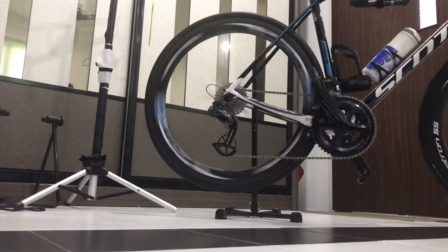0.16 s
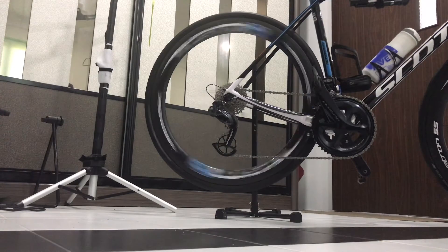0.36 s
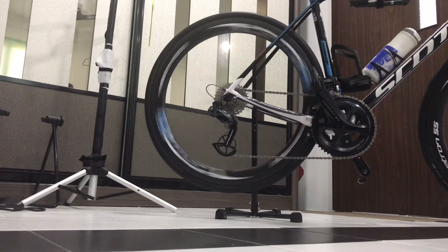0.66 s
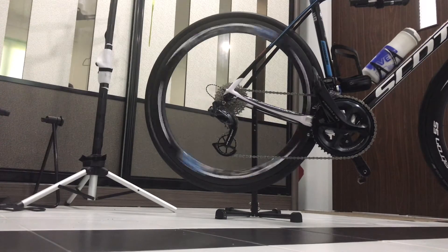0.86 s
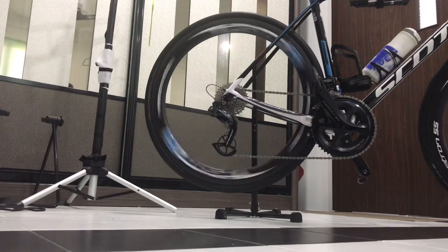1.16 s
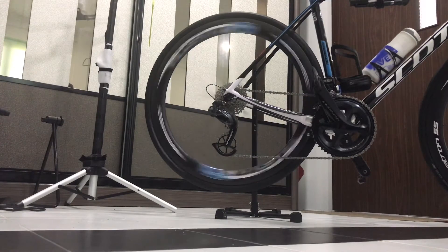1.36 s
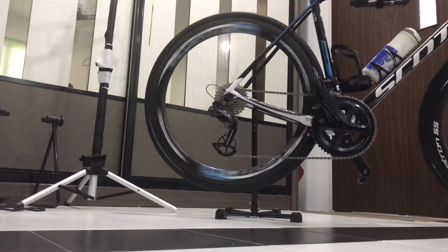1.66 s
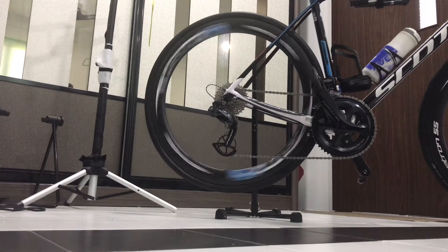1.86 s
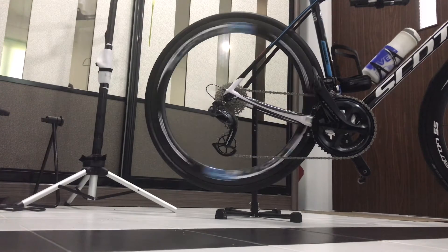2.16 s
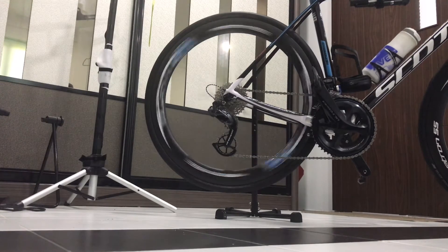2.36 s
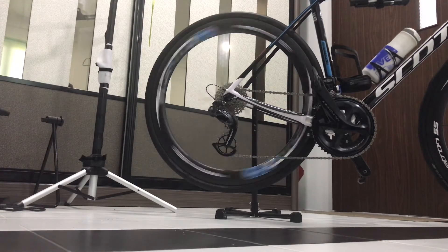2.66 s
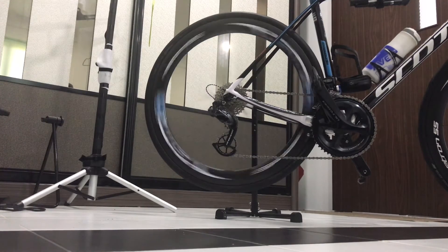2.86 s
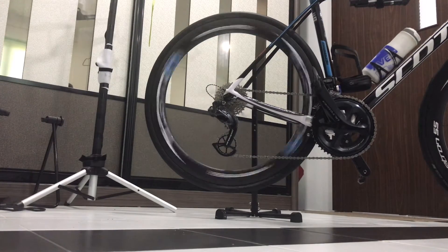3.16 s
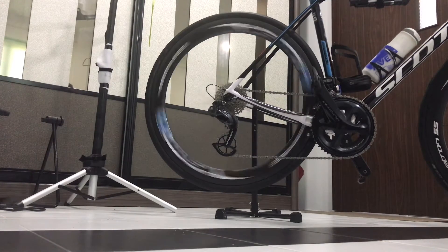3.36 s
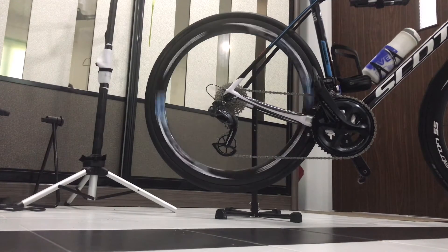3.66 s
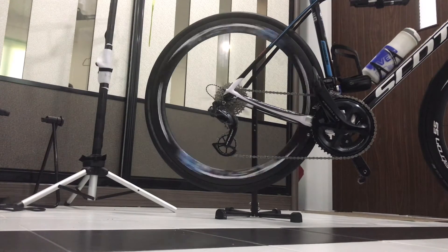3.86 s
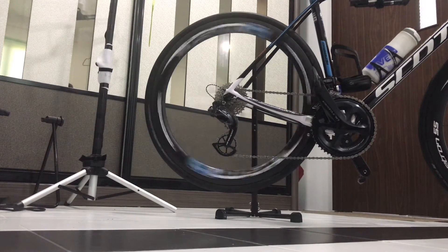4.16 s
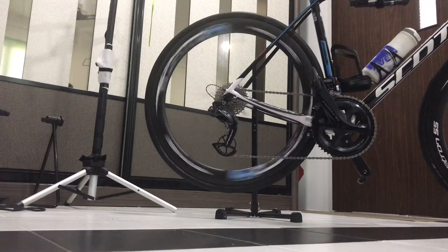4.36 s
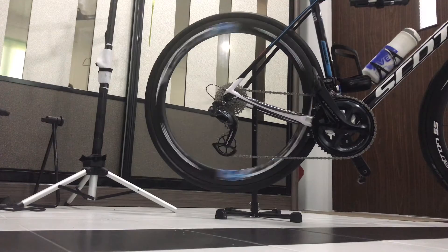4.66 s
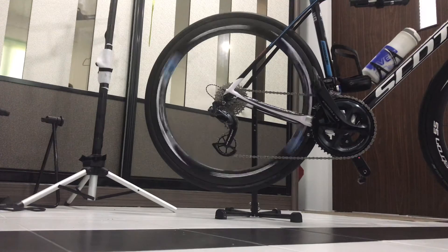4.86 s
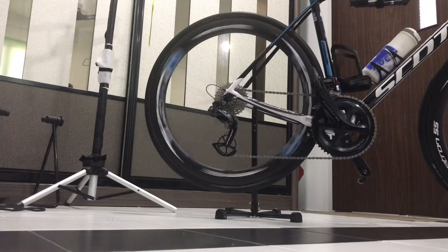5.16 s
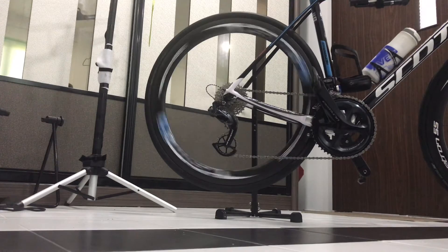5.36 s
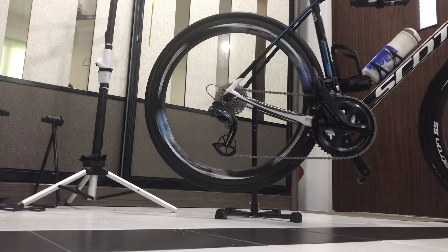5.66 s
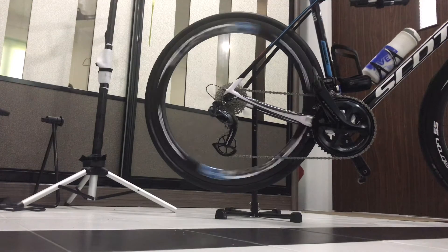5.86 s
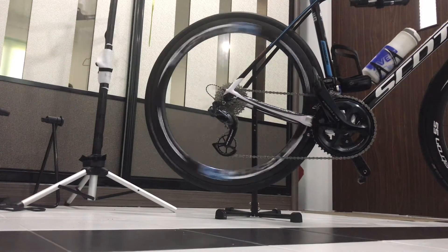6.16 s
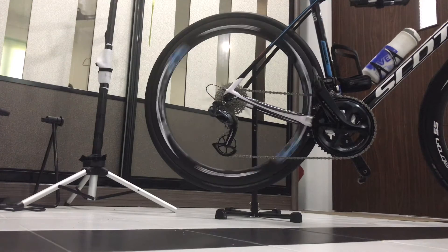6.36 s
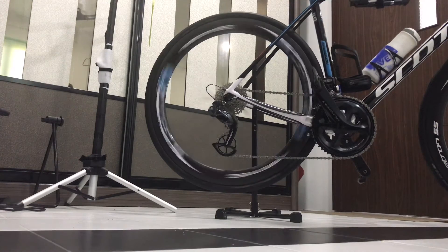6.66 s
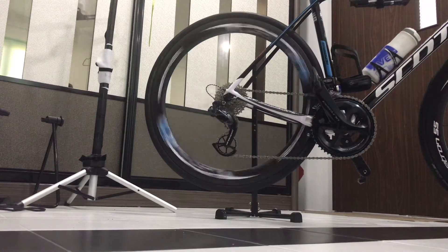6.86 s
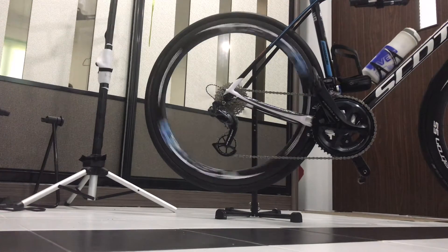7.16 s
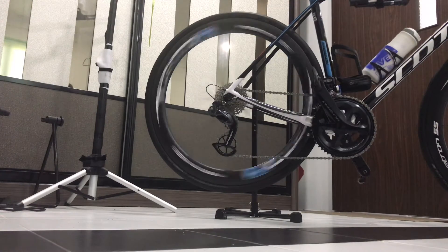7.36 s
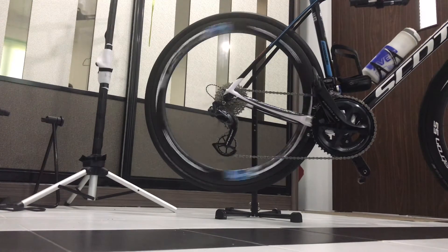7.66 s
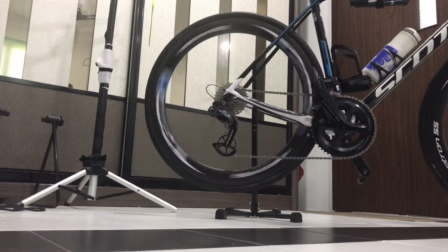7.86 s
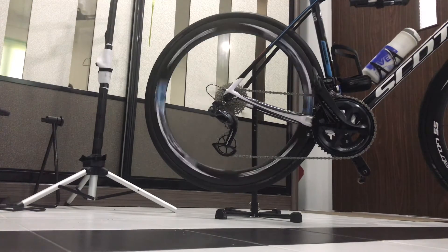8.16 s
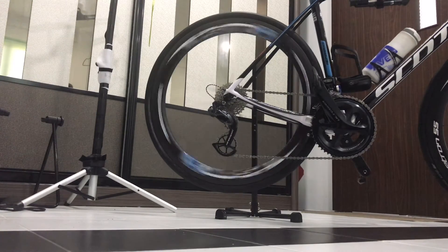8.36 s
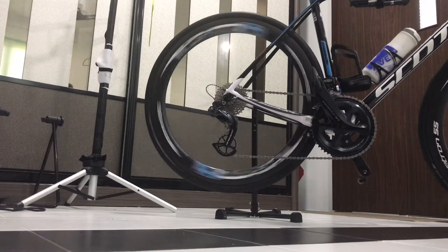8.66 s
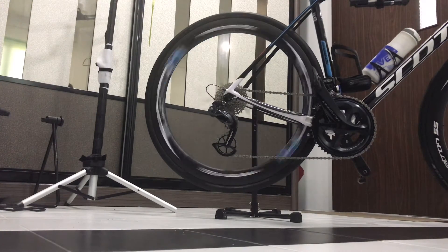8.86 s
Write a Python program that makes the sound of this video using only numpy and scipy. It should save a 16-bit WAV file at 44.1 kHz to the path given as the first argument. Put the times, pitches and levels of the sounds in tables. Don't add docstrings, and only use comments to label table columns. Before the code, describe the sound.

A bicycle's rear wheel coasts on a stand indoors. Its hub ratchet makes sharp steel clicks, nearly fifty a second at first, merging into a bright rattling buzz that slows steadily to somewhat under forty. The clicks vary slightly in tone and timing, repeating with each wheel turn. Close hard surfaces add brief echoes. Ventilation rumble and distant machine hum lie faintly underneath. Single-channel pickup, fairly near.

```python
import sys
import numpy as np
from scipy import signal
from scipy.fft import rfft, irfft, next_fast_len
from scipy.io import wavfile
from scipy.ndimage import uniform_filter1d, map_coordinates

SR = 44100
rng = np.random.default_rng(int(sys.argv[2]) if len(sys.argv) > 2 else 0)


def file_out(sig):
    cols = np.atleast_2d(sig).T
    lim = np.clip(cols, -1, 1)
    pcm = np.round(lim * 32767).astype(np.int16)
    wavfile.write(sys.argv[1], SR, pcm)


def boost_factor(decibels):
    exponent = np.asarray(decibels, float) / 20
    return 10 ** exponent


N = 397782
TEETH_COUNT = 24


def ratchet():
    # f/Hz, level/dB
    facing_tone = [(1900, -4), (3200, -2.5), (9000, -.5)]
    level_db, scatter_db = -31, 0.55
    moment, tooth = drops()
    t = np.arange(3072) / SR
    blow = crack(tooth, t) + boost_factor(-6) * ringing(tooth, t)

    def radiated(hz):
        return boost_factor(along(facing_tone, hz)) * shaded(tooth, hz) * coloured(tooth, hz)

    blow = filtered(blow, radiated)
    blow = blow * boost_factor(level_db + scatter_db * rng.standard_normal(len(moment)))[:, None]
    heard = signal.fftconvolve(blow, room(wet_db=-2.5)[tooth], axes=1)
    start = np.round((moment + .5 - .0004) * SR).astype(int)
    at = start[:, None] + np.arange(heard.shape[1])
    return np.bincount(at.ravel().clip(0), heard.ravel())[SR // 2:N + SR // 2]


def drops():
    # start/teeth, rate/(teeth/s), drag/(teeth/s^2), easing/(teeth/s^3)
    coast = (0.11899, 46.85736, 0.582202, 0.00252791)
    # waves per turn, late/ms, angle/turns
    runout = [
        (1, .3, .39),
        (3, .11, .4),
        (5, .08, .4),
    ]
    t = np.arange(-SR // 2, N) / SR
    start, rate, drag, easing = coast
    passed = start + rate * t - drag * t ** 2 + easing * t ** 3
    count = np.arange(np.ceil(passed[0]), passed[-1]).astype(int)
    late_ms = sum(ms * np.cos(2 * np.pi * waves * (count / TEETH_COUNT - at)) for waves, ms, at in runout)
    return np.interp(count, passed, t) + late_ms / 1000, count % TEETH_COUNT


def crack(tooth, t):
    # f/Hz, level/dB per Hz
    steel = [(350, -21.5), (750, -27.5), (1310, -13.5), (1800, -6.5), (2800, -3), (4020, -10.5),
             (4940, -18.5), (5700, -16), (6950, -11), (8400, -10.5), (8800, -6), (10500, -6), (13500, 0.5),
             (15800, -4.5)]
    # f/Hz, level/dB over the crack
    contact = [(500, 13), (1100, 25.5), (1600, 9), (3000, 8), (4200, 17.5), (7000, 7.5), (12000, 5)]
    # f/Hz, width/Hz, level/dB over the crack
    hub_modes = [(6250, 144, 8), (8770, 210, -7.5), (9770, 223, 3.5), (11060, 250, 2), (12200, 200, -9),
                 (14700, 280, -7), (15670, 194, 5)]
    gap_ms, gap_spread, second_level_db, second_spread_db = 1.1, .3, -9, 4
    low_rise_s, high_rise_s = .0012, 0.00061
    top_scatter_db, lobe_gain = 1.1, .65

    gap, size = worn(tooth, 2, fresh=0.081).T
    second_db = second_level_db + second_spread_db * size[:, None]
    later = np.clip(t - gap_ms * np.exp(gap_spread * gap[:, None]) / 1000, 0, None)

    def strike(since, t60, rise):
        return boost_factor(-60 * since / t60) * (1 - np.exp(-since / rise))

    def pawls(t60, rise=high_rise_s):
        return strike(t, t60, rise) + boost_factor(second_db) * strike(later, t60, rise / 4)

    burst = worn(tooth, len(t), fresh=0.35)
    low = evened(burst * pawls(0.049, low_rise_s), size=40, share=0.44)
    high = evened(burst * (pawls(0.019) + boost_factor(-9.0) * pawls(0.029)), size=40, share=0.49)
    top = evened(burst * (pawls(0.0099) + boost_factor(-10.5) * pawls(0.044)), size=40, share=0.64)

    def treble(hz):
        return 1 / (1 + (5200 / (hz + 1)) ** 6)

    def sharp(hz):
        return 1 / (1 + (11800 / (hz + 1)) ** 12)

    def hub(hz):
        return 1 + sum(boost_factor(db) / (1 + ((hz - centre) / width) ** 2) for centre, width, db in hub_modes)

    mode_hz, _, facing = beamed(tooth)

    def lobed(hz):
        return boost_factor(lobe_gain * np.array([np.interp(hz, mode_hz, row) for row in facing]))

    low = filtered(low, lambda hz: boost_factor(along(steel, hz) + 1.5) * (1 - treble(hz)) * lobed(hz))
    high = filtered(high, lambda hz: boost_factor(along(steel, hz)) * treble(hz) * hub(hz) * (1 - sharp(hz)))
    top = filtered(top, lambda hz: boost_factor(along(steel, hz) + 0.5) * hub(hz) * sharp(hz))
    top = top * boost_factor(top_scatter_db * worn(tooth, 1, fresh=0.3))
    click = 1. * (t == t[32])
    tick = filtered(click, lambda hz: boost_factor(along(steel, hz) + along(contact, hz)))
    return unit(tick + low + high + top)


def ringing(tooth, t):
    # f/Hz, t60/s, level/dB
    ring = [(1460, 0.023, 2), (1860, 0.024, -1), (2220, 0.04, 0.5), (2400, 0.018, -2), (2890, 0.036, -1),
            (3130, 0.037, -2.5), (3240, 0.043, -3.5), (4030, 0.018, 0.5), (5730, 0.017, 2.5),
            (6440, 0.047, 0), (8150, 0.031, 2)]
    lobe_gain, rise_s = 1.05, 0.0018
    hz, db, facing = beamed(tooth)
    t60 = along(np.array(ring)[:, :2], hz)
    trim_db = along(np.array(ring)[:, ::2], hz)
    lobes_db = lobe_gain * facing + .6 * worn(tooth, len(hz), fresh=.25)
    gain = boost_factor(db + trim_db + lobes_db) / np.sqrt(t60)
    phase = 2 * np.pi * rng.random(len(hz)) + hz / 2500 * worn(tooth, len(hz), fresh=0.11)
    fade = boost_factor(-60 * t / t60[:, None]) * (1 - np.exp(-t / rise_s))
    swing = 2 * np.pi * hz[:, None] * t
    sines = (gain * np.cos(phase)) @ (fade * np.sin(swing))
    cosines = (gain * np.sin(phase)) @ (fade * np.cos(swing))
    return unit(sines + cosines)


def beamed(tooth):
    # f/Hz, level/dB, lobe/dB, first angle/turns,
    # second angle/turns
    wheel_modes = [(1545, -3.5, 6.5, .35, .03), (1630, -5.3, 6, .29, .96), (1725, -.3, 4, .23, .54),
                   (1840, -1, 8, .73, .17), (1915, .3, 9, .73, .125), (1990, -.5, 6.5, .7, .135),
                   (2080, -1.7, 6.5, .52, .82),
                   (2240, -3.9, 4.5, .73, 0), (2350, -3, 3.5, .98, .5), (2470, -2, 4.5, .98, .42),
              (2600, -4.4, 5.5, .96, .43), (2700, -1.5, 6, .99, .81), (2785, -2, 4, .96, .36),
              (2900, -.5, 2, .58, .28), (3100, -7, 4, .8, .49), (3450, -5.9, 5, .62, .21),
                   (4050, -8.8, 3, .63, .03), (5700, -11.7, 4, .94, .63), (6330, -4.5, 3, .92, .6),
             (7960, -9, 3, .68, .09)]
    focus = 4
    hz, db, lobe_db, *beams = np.transpose(wheel_modes)
    angle = tooth[:, None] / TEETH_COUNT
    beam = sum(np.exp(focus * (np.cos(2 * np.pi * (angle - at)) - 1)) for at in beams)
    return hz, db, lobe_db * (beam - beam.mean(axis=0))


def shaded(tooth, hz):
    # f/Hz, width/Hz, depth/dB, angle/turns
    shade = (5940, 300, 1.1, 0.087)
    centre, width, depth_db, at = shade
    away = np.cos(2 * np.pi * (tooth[:, None] / TEETH_COUNT - at))
    return boost_factor(-depth_db * away * np.exp(-((hz - centre) / width) ** 2))


def coloured(tooth, hz):
    # f/Hz, spread/dB
    tooth_colour = [(2500, 0.5), (3500, 2.5), (8000, 1.5), (10000, 2.4), (13000, 0.8)]
    own = uniform_filter1d(rng.standard_normal((TEETH_COUNT, len(hz))), size=50, axis=1)
    return boost_factor(along(tooth_colour, hz) * unit(own))[tooth]


def worn(tooth, size, fresh):
    fresh = np.clip(fresh, 0, 1)
    own = rng.standard_normal((TEETH_COUNT, size))[tooth]
    return np.sqrt(1 - fresh) * own + np.sqrt(fresh) * rng.standard_normal((len(tooth), size))


def room(wet_db):
    # f/Hz, t60/s
    room_fade = [(500, 0.43), (2000, 0.33), (3500, 0.45), (6000, 0.54), (15000, 0.11)]
    # t/s, level/dB
    walls = [
        (.0035, -18),
        (.0065, -26),
        (.0095, -35),
        (0.0138, -13.5),
    ]
    shared_below_hz = 3500
    hz, t, z = signal.stft(rng.standard_normal((TEETH_COUNT, SR // 4)), SR, nperseg=256)
    shared = (z + np.roll(z, 1, axis=0) + np.roll(z, -1, axis=0)) / np.sqrt(3)
    z = np.where(hz[:, None] < shared_below_hz, shared, z)
    tail = signal.istft(z * boost_factor(-60 * t / along(room_fade, hz)[:, None]), SR, nperseg=256)[1]
    tail = boost_factor(wet_db) * tail / np.linalg.norm(tail, axis=1, keepdims=True)
    answer = np.pad(tail, ((0, 0), (round(.004 * SR), 0)))
    answer[:, 0] = 1
    for s, db in walls:
        shifted = np.round((s + .0001 * rng.standard_normal(TEETH_COUNT)) * SR).astype(int)
        answer[np.arange(TEETH_COUNT), shifted] += boost_factor(db)
    return answer


def air():
    # f/Hz, level/dB per Hz
    air_tone = [(28, -44), (40, -5), (70, -6.5), (110, -4.5), (190, -4.5), (300, -6.5), (455, -10),
                (741, -12.5), (1300, -14), (1700, -49), (2900, -120)]
    level_db, patch_db = -55.5, 1.5
    z = signal.stft(rng.standard_normal(N), nperseg=2048)[2]
    patches = uniform_filter1d(rng.standard_normal(z.shape), size=8, axis=0)
    patches = unit(uniform_filter1d(patches, size=10, axis=1))
    noise = signal.istft(z * boost_factor(patch_db * patches), nperseg=2048)[1][:N]
    return boost_factor(level_db) * unit(filtered(noise, lambda hz: boost_factor(along(air_tone, hz))))


def machines():
    # f/Hz, level/dB, unsteadiness/rad
    hum_lines = [(48, -68, 1.8), (98, -63.5, 2.5), (122, -69, 2.2), (143, -67, 1.5), (161.5, -64.5, 1.5),
                 (200, -71, 1.8), (290, -74, 2.2), (607, -76, 3), (900, -78, 4), (1030, -77, 4)]
    swell_db = 2
    t = np.arange(N) / SR
    hum = np.zeros(N)
    for hz, db, unsteady in hum_lines:
        drift = np.cumsum(rng.standard_normal(N)) * unsteady / 160
        hum += boost_factor(db + 3.5 + swell_db * wobble(4)) * np.sin(2 * np.pi * hz * t + drift)
    return hum


def wobble(rate):
    return map_coordinates(rng.standard_normal(int(N * rate / SR) + 4), [np.arange(N) * rate / SR])


def evened(bursts, size, share):
    z = rfft(bursts)
    broad = uniform_filter1d(abs(z) ** 2, size=size, axis=1)
    return irfft(z * (broad / broad.mean()) ** (-np.clip(share, 0, 1) / 2), bursts.shape[1])


def unit(x):
    return x / np.sqrt(np.mean(x ** 2) + 1e-20)


def along(points, hz):
    f, v = np.transpose(points)
    return np.interp(np.log(hz + 1), np.log(f + 1), v)


def filtered(x, response):
    n = x.shape[-1]
    m = next_fast_len(n + 1024)
    return irfft(rfft(x, m) * response(np.fft.rfftfreq(m, 1 / SR)), m)[..., :n]


def scene():
    return (boost_factor(-6) * ratchet() + air() + machines())[None]


def low_pass(x):
    return signal.sosfilt(signal.butter(12, 16850, fs=SR, output="sos"), x)


def record(dry):
    top_hz = 15780

    def band(hz):
        skirt = boost_factor(-45 - 22 * np.clip(hz - top_hz, 0, None) / 1000)
        return 1 / (1 + (hz / top_hz) ** 500) + skirt

    return low_pass(filtered(dry, band))


dry = scene()
out = record(dry)
file_out(out)
```